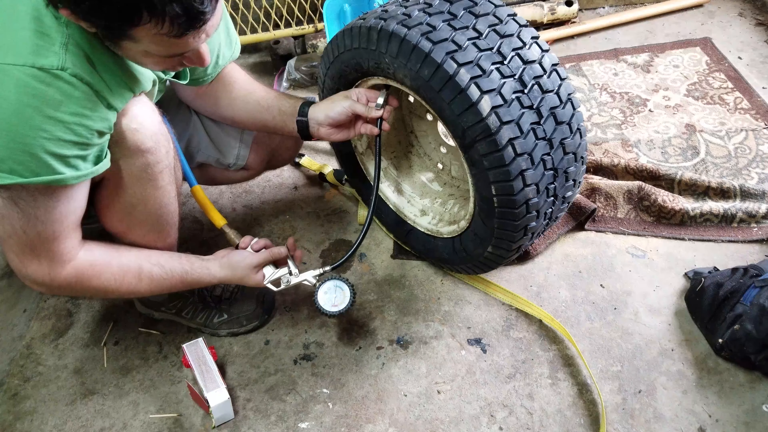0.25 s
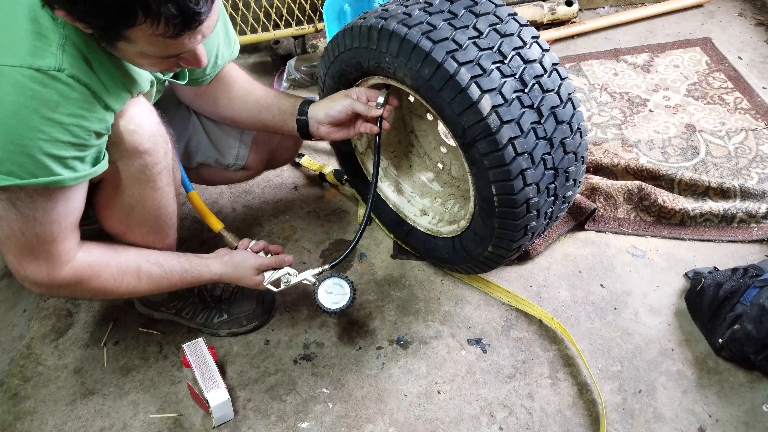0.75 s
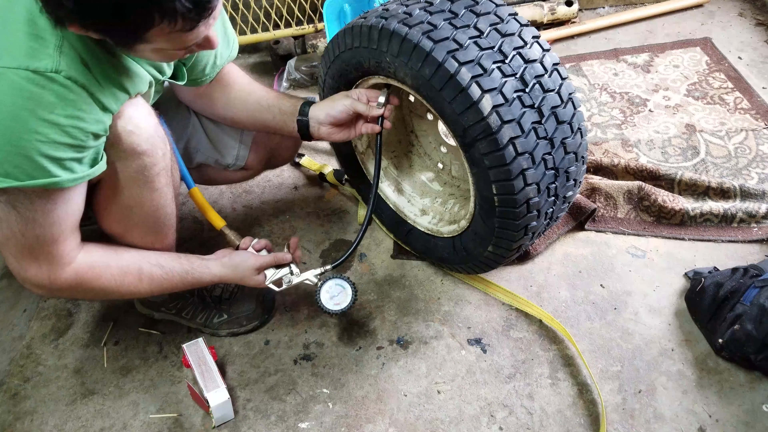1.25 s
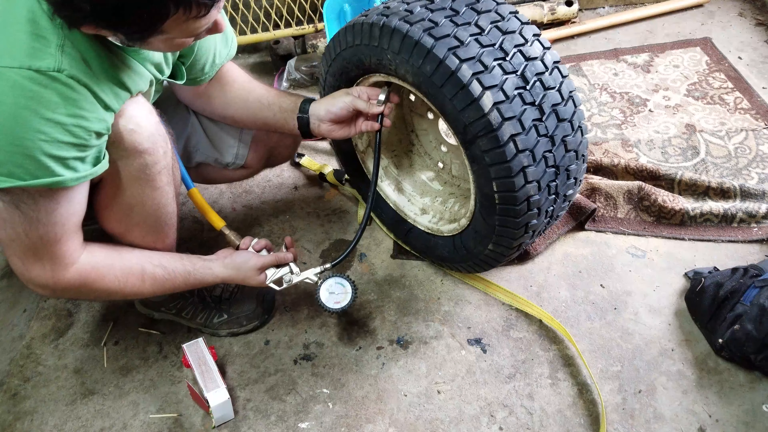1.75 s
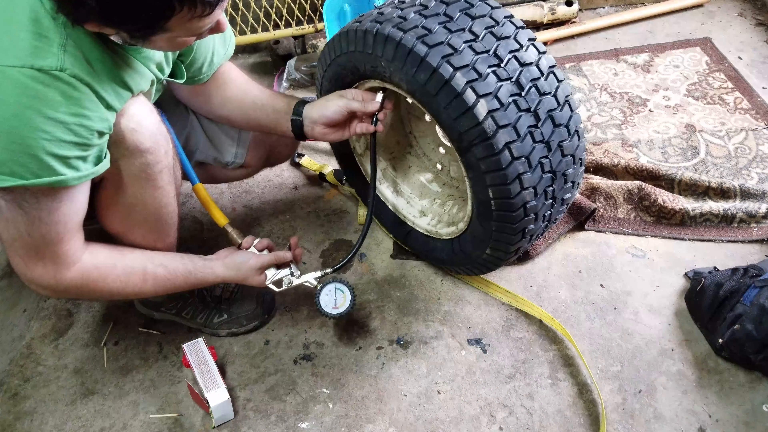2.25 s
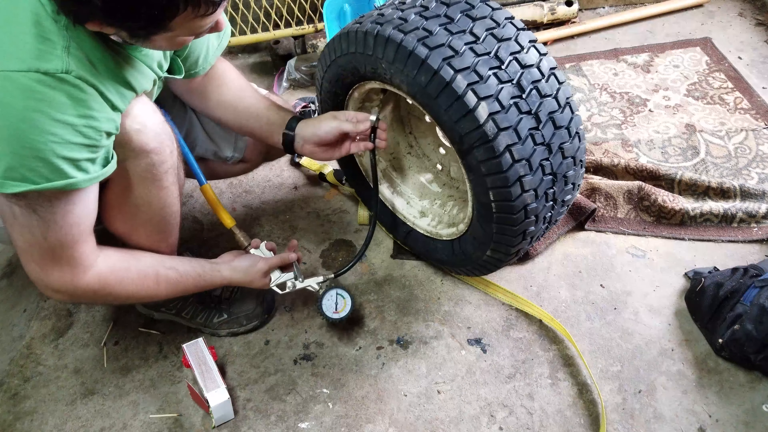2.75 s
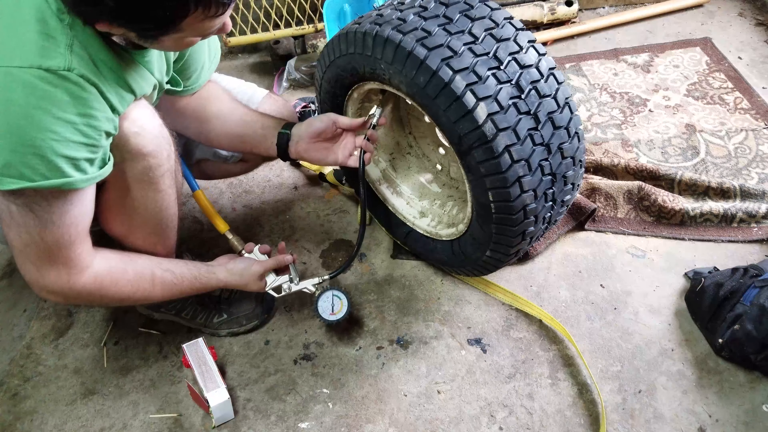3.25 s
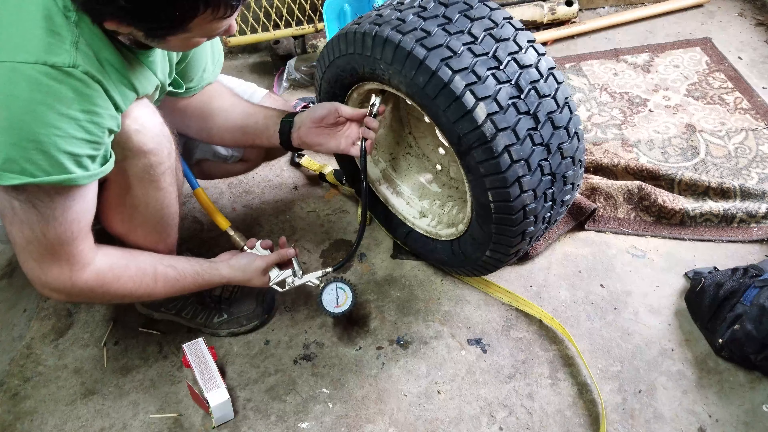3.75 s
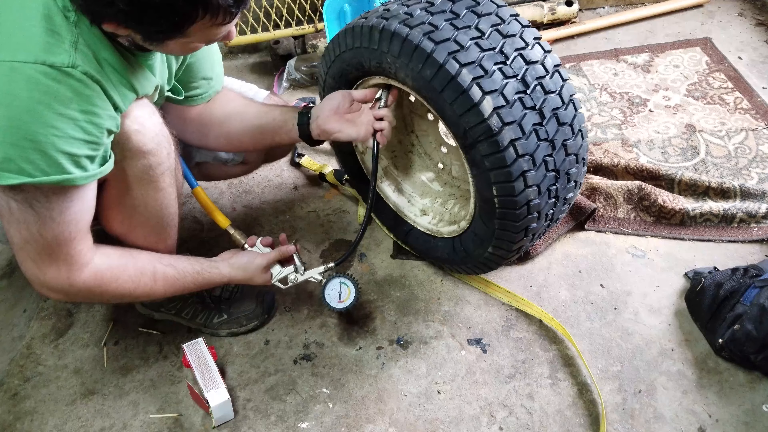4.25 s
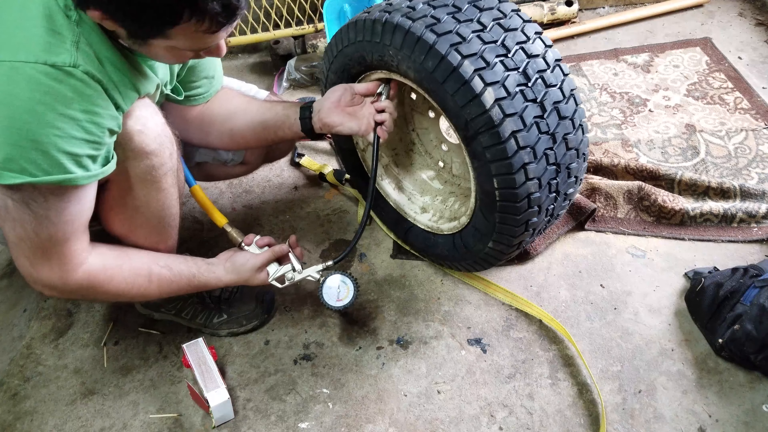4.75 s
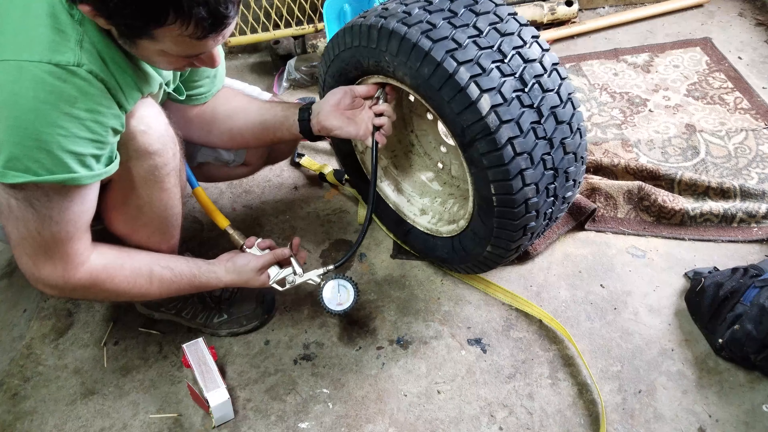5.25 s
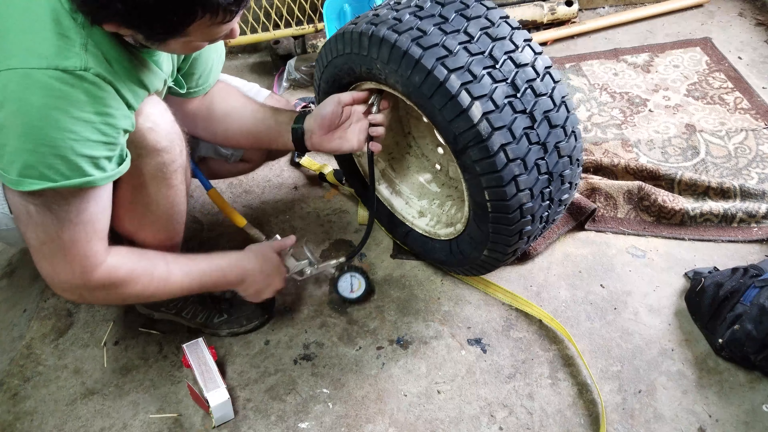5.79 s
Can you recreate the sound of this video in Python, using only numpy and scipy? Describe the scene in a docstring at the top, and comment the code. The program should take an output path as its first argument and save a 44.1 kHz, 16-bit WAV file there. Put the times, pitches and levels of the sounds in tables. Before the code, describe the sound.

In a workshop, a nearby tire is being filled with air. A bright hiss comes in several wavering surges, lightly whistling at the start, then leaves only a thin steady leak. More spurts follow, with a few small ticks from the hose fittings. The seal slips for one loud, brief burst, and air keeps seeping softly afterward. A distant motor hums very faintly underneath.

```python
"""A tire is filled through a hand-held chuck on a workshop floor. Air escapes round the valve in uneven bursts
as the chuck rocks on the stem, whistling at first and blasting once when the seal slips.
The hose fittings knock lightly; a fine leak and a distant motor fill the pauses."""
import sys
import numpy as np
from scipy import signal
from scipy.fft import rfft, irfft, next_fast_len
from scipy.io import wavfile
from scipy.ndimage import uniform_filter1d, map_coordinates

SR = 44100
rng = np.random.default_rng(int(sys.argv[2]) if len(sys.argv) > 2 else 0)


def master(y):
    """Save y as 16-bit WAV."""
    cut = np.clip(np.atleast_2d(y).T, -1, 1)
    pcm = np.round(cut * 32767)  # scale
    wavfile.write(sys.argv[1], SR, pcm.astype(np.int16))


N = 265658

# (Hz, dB per Hz): a thin slit hisses high, a wider gap rushes, an open one blows
SLIT = [(6000, -30.5), (8600, -10), (9600, -8), (10400, -2.5), (11500, 1), (12300, 0.5), (13600, 0.5), (14500, 0.5), (15700, -2.5)]
GAP = [(2000, -42), (2700, -10.5), (3400, -5), (4300, -1.5), (5300, -0.5), (6400, -0.5), (7200, 1.5), (8400, -6.5), (10000, -3.5), (14000, -50)]
BLOW = [(100, -20), (250, -20.5), (420, -7.5), (540, -12), (750, -5.5), (1050, -7), (1430, 0.5), (1900, 1), (2500, 2), (3500, -20.5), (6000, -53)]
# edge tones of the narrow gap: (Hz, pitch waver Hz, dB, fade dB a second)
WHISTLE = [(1123, 7.1, -24, 14), (5480, 11, 0.5, 130), (6176, 22, -11, 8), (6980, 18, 1, 12), (7670, 37, -15.5, -3), (10840, 13, -8, 21), (11700, 45, -4.5, -10), (15110, 20, -6, 7), (15640, 22, 3, 6)]
# light knocks of the chuck and hose: (s, peak dB, body Hz, body dB relative, click dB relative)
KNOCKS = [(1.847, -67.5, 223, 1.5, -31), (1.871, -60, 1810, -1, -13), (4.155, -53, 5100, -10, -2.5), (4.253, -54.5, 3020, -3, 1.5), (4.528, -57.5, 11400, 7, -2.5), (4.548, -48, 5200, 0.5, -12), (4.592, -61, 390, -2.5, -20), (5.35, -73.5, 510, 2, -14)]
CLICK = [(150, -7), (700, 0.5), (1500, 5), (2200, -2), (3200, 5), (6800, 3.5), (8500, -5), (12000, 5), (16000, -23)]  # (Hz, dB per Hz)
LEAK = [(1000, -44), (1900, -28.5), (2450, -23.5), (2700, -17), (3400, -21.5), (4300, -13.5), (5300, -20.5), (6300, -16.5), (7000, -11.5), (8500, -18.5), (9500, -10), (11000, -14.5), (13200, -8.5), (14700, -1.5), (15700, -5.5)]  # the fine steady leak: (Hz, dB per Hz)
SHOP = [(20, -62), (32, -7), (42, -10), (60, 7), (90, 0.5), (140, -1), (200, -12.5), (350, -17.5), (600, -16), (950, -19), (1400, -19), (2000, -17), (3000, -24)]  # (Hz, dB per Hz)
MOTOR_HZ = 57.6
# (shaft order, dB)
MOTOR = [(1, -74.5), (2.1, -87), (4, -96), (5, -94.5), (8, -94.5), (9, -90.5), (11, -86.5), (13, -96), (22, -101), (24, -93), (25, -100)]
SHOP_ALIKE = [(60, 0.95), (130, 0.99), (300, 0.12), (1400, 0.062)]  # (Hz, left-right likeness)
LEAK_ALIKE = [(2000, 0), (7000, 0.074), (15000, 0.024)]
BALANCE_DB = [(60, 2), (125, 6.5), (500, 0.5), (1000, 7.5), (3000, 5.5), (6000, 4), (8500, -0.5), (11500, 3.5), (15000, -4)]  # (Hz, left minus right dB)
WALLS = [(200, 0.27), (2000, 0.61), (6000, 0.37), (15000, 0.22)]  # (Hz, t60 s)
WET = [(200, -11), (1500, 3.5), (5000, -1.5), (9000, 2.5), (15000, 14.5)]  # (Hz, room over direct dB)
TOP_HZ = 15780  # fixed
# where the jet points: (s, top octave dB, left minus right dB)
AIM = [(0, -5, 1.5), (.25, -1, -2), (.55, 1, -1.5), (1.7, -0.5, -1), (3.5, 3.5, 0), (4.65, -1, -1.5), (5.2, -2, 0), (6.02, -0.5, -0.5)]
CLOTH = [(50, -12), (90, 13), (140, -7), (300, -2.5), (600, -17), (1100, -2), (1600, -21), (3000, -7), (8000, -29)]  # (Hz, dB per Hz)
JET_ALIKE = [(300, 1), (3000, 0.87), (9000, 0.27), (15000, 0.35)]  # (Hz, left-right likeness of the jet before the room)
# the seal lifts as the chuck rocks: (start s, attack s, hold s, release t60 s, flow dB, rush of a wide gap relative dB, low blow relative dB)
BURSTS = [(.18, 0.56, 0.079, 0.3, -44.5, -8, -24.5), (1.025, 0.17, 0.17, 0.47, -44.5, -7, -23.5), (1.555, 0.067, 0.21, 0.08, -47, -6.5, -22.5), (1.678, 0.016, 0.014, 0.35, -43, -9, -20),
          (3.342, 0.018, 0.15, 0.22, -47.5, -8, -26), (3.39, 0.1, .14, 0.49, -51, -6.5, -19), (3.735, 0.08, .11, 0.23, -46.5, -9, -25.5),
          (4.565, .024, 0.13, .23, -31, -5.5, -21.5), (4.72, 0.065, .14, 1.2, -53.5, -2.5, -14), (5.22, 0.059, 0.21, 0.85, -56.5, -7.5, -36)]
# between bursts the badly seated chuck seeps, with the same columns
SEEPS = [(-.05, 0.027, 1.85, 0.11, -51.5, -8.5, -25.5), (4.6, .1, 1.4, .12, -54.5, -11, -26)]
WIDEN_DB = 2.5  # the air pries the gap open: growth of the rush over one burst
WHISTLE_DB, WHISTLE_HOLD_S, WHISTLE_T60 = -58, 0.46, 1.9  # the edge tones last until the first burst widens the gap
BORE_DB, BORE_FADE_DB_PER_S = -61.5, 6  # the bore of the chuck sings under the flow, less as the chuck settles
LEAK_DB, RUMBLE_DB = -60.5, -75.5
# sleeve and hose drag as the hand leaves the trigger: (start s, attack s, hold s, release t60 s, dB)
DRAG_STROKE = (5.5, 0.6, 1, .3, -75)
# dull bumps of the hose and wheel being shifted: (start s, attack s, hold s, release t60 s, dB)
BUMPS = [(.28, .1, .22, .4, -75), (2.57, 0.044, .07, .4, -73.5), (5.85, 0.073, .1, .4, -72.5)]
THUD = [(45, -24), (70, -9), (92, 3), (125, -12), (200, -25), (400, -45)]  # (Hz, dB per Hz)
BLOW_SAG_DB = 3  # the low blow is strongest as an opening starts and sags by this much
BORE_FLOW_DB, BORE_GROWTH = -44, 1.3  # the flow at which it reaches that level; dB gained for each dB of flow


def amp(db):
    """Decibels to gain."""
    return 10 ** (np.asarray(db) / 20)


def unit(x):
    """Scaled to rms 1."""
    return x / np.sqrt(np.mean(x ** 2) + 1e-20)


def along(points, hz):
    """(Hz, value) points read on a log axis."""
    f, v = np.transpose(points)
    return np.interp(np.log(hz + 1), np.log(f + 1), v)


def curves(rows):
    """One value per sample for each column after the time."""
    s, *cols = np.transpose(rows)
    return [np.interp(np.arange(N) / SR, s, c) for c in cols]


def wobble(rate):
    """A smooth random curve, rate knots a second."""
    return map_coordinates(rng.standard_normal(int(N * rate / SR) + 4), [np.arange(N) * rate / SR])


def filtered(x, response):
    """x times a response of frequency."""
    m = next_fast_len(N + SR // 2)
    return irfft(rfft(x, m) * response(np.fft.rfftfreq(m, 1 / SR)), m)[..., :N]


def noise(spectrum):
    """Noise of rms 1 with the given colour."""
    return unit(filtered(rng.standard_normal(N), lambda hz: amp(along(spectrum, hz))))


def diffuse(spectrum, alike):
    """Stereo noise that arrives from all round."""
    turn = lambda hz: np.arccos(np.clip(along(alike, hz), -1, 1)) / 2
    mid, side = noise(spectrum), filtered(noise(spectrum), lambda hz: np.tan(turn(hz)))
    return np.array([mid + side, mid - side])


def resonance(f, hz, width):
    """Response of one mode."""
    return 1j * f * width / (hz * hz - f * f + 1j * f * width)


def jet(flows, slit_db, gap_db, blow_db, flutter_db, sputter_db, beam_hz):
    """Turbulence at the leaking seal: the wider the gap, the lower its sound reaches."""
    hissing, rushing, blowing = flows
    # the jet is a spread-out cloud of eddies, so the two sides hear slightly different detail
    slit, gap, blow = (diffuse(spectrum, JET_ALIKE) for spectrum in (SLIT, GAP, BLOW))
    # the shortest waves leave in a beam that turns with the chuck
    beam = filtered(slit, lambda hz: 1 / (1 + (beam_hz / (hz + 1)) ** 10))
    slit = slit + (amp(curves(AIM)[0]) - 1) * beam
    air = amp(slit_db) * hissing * slit + amp(gap_db) * rushing * gap + amp(blow_db) * blowing * blow
    # the rubber seal trembles in the stream
    return air * amp(flutter_db * wobble(35) + sputter_db * wobble(400))


def whistle(flow, rough_db, bore_hz, bore_waver_hz):
    """A narrow gap feeds the air columns of chuck and stem; most tones fade as the chuck settles."""
    t = np.arange(N) / SR
    tones = sum(amp(db - fade * t) * tone(hz, waver, rough_db) for hz, waver, db, fade in WHISTLE)
    edge = amp(WHISTLE_DB - 60 * np.maximum(t - WHISTLE_HOLD_S, 0) / WHISTLE_T60)
    bore = np.minimum(flow / amp(BORE_FLOW_DB), 1) ** BORE_GROWTH * amp(BORE_DB - BORE_FADE_DB_PER_S * t)
    return edge * tones + bore * tone(bore_hz, bore_waver_hz, rough_db)


def knocks(t60, body_q):
    """Fittings shift in the hands: a short scrape with one damped resonance."""
    attack = .003  # fixed
    click, out = noise(CLICK), np.zeros(N)
    for s, db, body_hz, body_db, click_db in KNOCKS:
        t = np.maximum(np.arange(N) / SR - s, 0)
        ring = amp(body_db) * narrow(body_hz, body_hz / body_q)
        out += amp(db - 60 * t / t60) * (1 - np.exp(-t / attack)) * (ring + amp(click_db) * click)
    return out


def motor(level_db, drift):
    """A distant induction motor hums on the orders of its shaft."""
    turns = np.cumsum(MOTOR_HZ * (1 + drift * wobble(3.02))) / SR
    return sum(amp(level_db + db + 0.29 * wobble(4.0)) * np.sin(2 * np.pi * (order * turns + rng.random())) for order, db in MOTOR)


def background(swell_db, patchy_db):
    """The shop's low rumble and the fine leak of the air line."""
    rumble = amp(RUMBLE_DB + swell_db * wobble(5.4)) * diffuse(SHOP, SHOP_ALIKE)
    return rumble + amp(LEAK_DB) * patchy(diffuse(LEAK, LEAK_ALIKE), patchy_db, size=(3, 40))


def workshop(x, near_t60, near_db, count):
    """The paths to the microphone change as the hands move: one set of reflections hands over to the next."""
    echo, step = np.zeros((2, N + 2 * SR)), N // count + 1
    for k in range(count + 1):
        span = np.arange(max((k - 1) * step, 0), min((k + 1) * step, N))
        share = np.cos(np.pi / 2 * (span / step - k))
        part = signal.fftconvolve(x[:, span] * share, reflections(near_t60, near_db), axes=1)
        echo[:, span[0]:span[0] + part.shape[1]] += part
    # the treble beams away from the microphone and arrives mostly reflected
    wet = lambda f: amp(along(WET, f))
    return filtered(x + filtered(echo[:, :N], wet), lambda f: 1 / np.sqrt(1 + wet(f) ** 2 / 2))


def narrow(hz, width):
    """Noise of rms 1 ringing in one resonance."""
    return unit(filtered(rng.standard_normal(N), lambda f: resonance(f, hz, width) ** 2))


def reflections(near_t60, near_db):
    """Wheel rim and concrete floor scatter the sound at once; the walls answer later."""
    hz, t, z = signal.stft(rng.standard_normal((2, SR // 2)), SR, nperseg=256)
    z = z * (amp(-60 * t / along(WALLS, hz)[:, None]) + amp(near_db - 60 * t / near_t60)) * (t > 0)
    # the scattering favours no pitch
    tail = signal.istft(z / np.linalg.norm(z, axis=2, keepdims=True), SR, nperseg=256)[1]
    return tail / np.linalg.norm(tail, axis=1, keepdims=True)


def tone(hz, waver_hz, rough_db):
    """A whistle of rms 1 whose pitch and strength shake in the turbulence."""
    phase = 2 * np.pi * np.cumsum(hz + waver_hz * wobble(120)) / SR
    return unit(np.sin(phase) * amp(rough_db * wobble(90)))


def patchy(x, depth_db, size):
    """The colour of a hiss drifts in patches of time and pitch."""
    z = signal.stft(x, nperseg=512)[2]
    field = uniform_filter1d(uniform_filter1d(rng.standard_normal(z.shape[1:]), size[0], 0), size[1], 1)
    return signal.istft(z * amp(depth_db * unit(field)), nperseg=512)[1][:, :N]


def envelope(start, attack, hold, t60):
    """Gain that swells smoothly, holds and dies away."""
    age = np.arange(N) / SR - start
    return np.sin(np.pi / 2 * np.clip(age / attack, 0, 1)) ** 2 * amp(-60 * np.maximum(age - attack - hold, 0) / t60)


def airflow():
    """Strength of hiss, rush and blow: all openings of the seal add in power."""
    t, power = np.arange(N) / SR, np.zeros((3, N))
    for openings, widen_db in ((BURSTS, WIDEN_DB), (SEEPS, 0)):
        for start, attack, hold, t60, db, rush_db, blow_db in openings:
            flow = amp(db) * envelope(start, attack, hold, t60)
            progress = np.clip((t - start) / (attack + hold), 0, 1.4) - .5
            rush, blow = amp(rush_db + widen_db * progress), amp(blow_db - BLOW_SAG_DB * progress)
            power += np.array([flow, flow * rush, flow * blow]) ** 2
    return np.sqrt(power)


def rubbing(strokes, spectrum):
    """Soft friction noise that swells with each stroke."""
    return noise(spectrum) * sum(amp(db) * envelope(start, attack, hold, t60) for start, attack, hold, t60, db in strokes)


def scene():
    """All sources in the room, as the two microphone ports receive them."""
    flows = airflow()
    air = jet(flows, slit_db=0.0, gap_db=-0.5, blow_db=-1.37, flutter_db=0.38, sputter_db=1.18, beam_hz=13300)
    handling = knocks(t60=0.088, body_q=3.2) + rubbing([DRAG_STROKE], CLOTH)
    tones = whistle(flows[0], rough_db=3.0, bore_hz=2690, bore_waver_hz=29.5)
    near = workshop(air + handling + amp(-2) * tones, near_t60=0.023, near_db=17.5, count=16) + amp(-12.5) * tones
    # the turning jet shifts the sound between the ports
    near = near * amp(np.outer([1, -1], curves(AIM)[1]) / 2)
    mix = near + rubbing(BUMPS, THUD) + motor(level_db=1, drift=0.00094) + background(swell_db=-1.27, patchy_db=1.5)
    return filtered(mix, lambda hz: amp(np.outer([1, -1], along(BALANCE_DB, hz)) / 2))


def record(dry):
    """The recorder keeps nothing above its band limit."""
    return filtered(dry, lambda hz: hz < TOP_HZ)


dry = scene()
out = record(dry)
master(out)
```